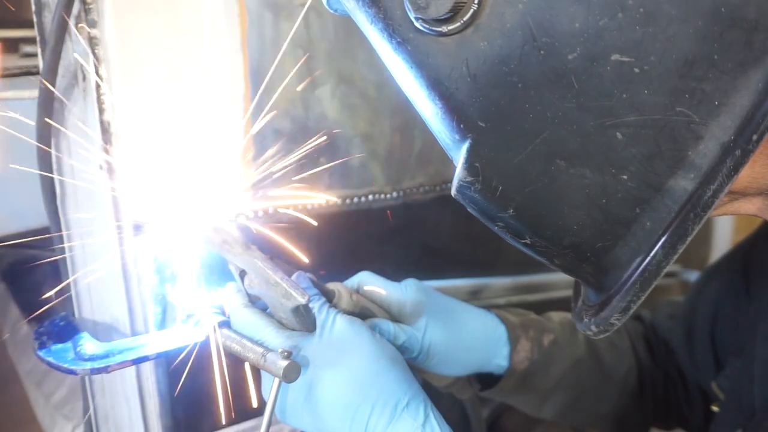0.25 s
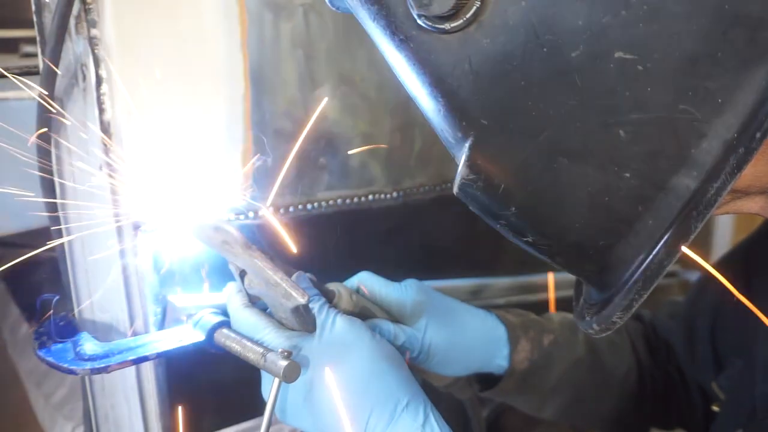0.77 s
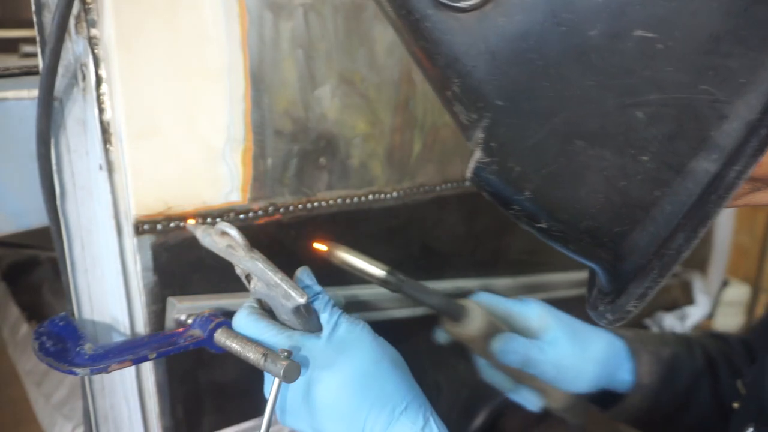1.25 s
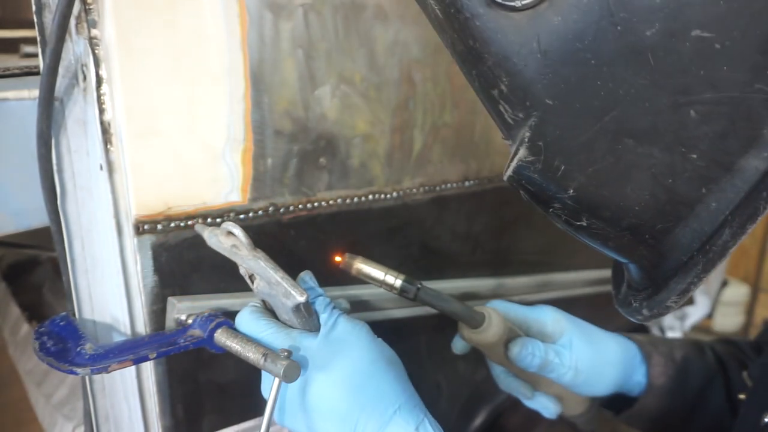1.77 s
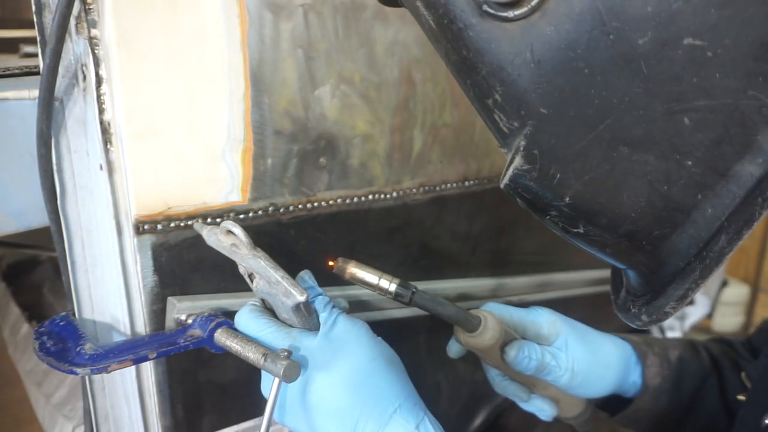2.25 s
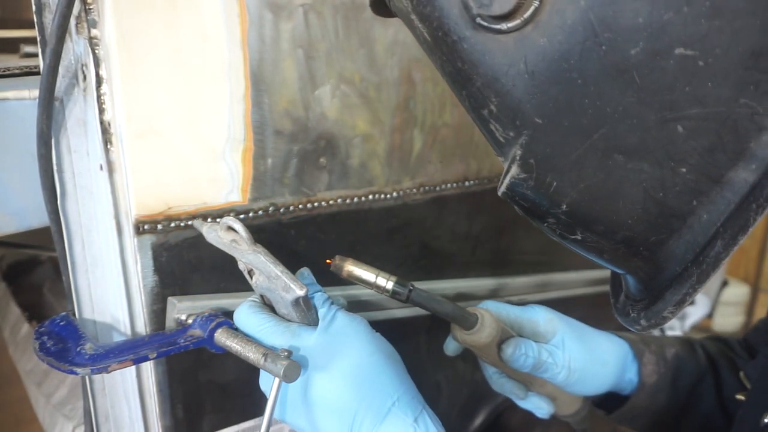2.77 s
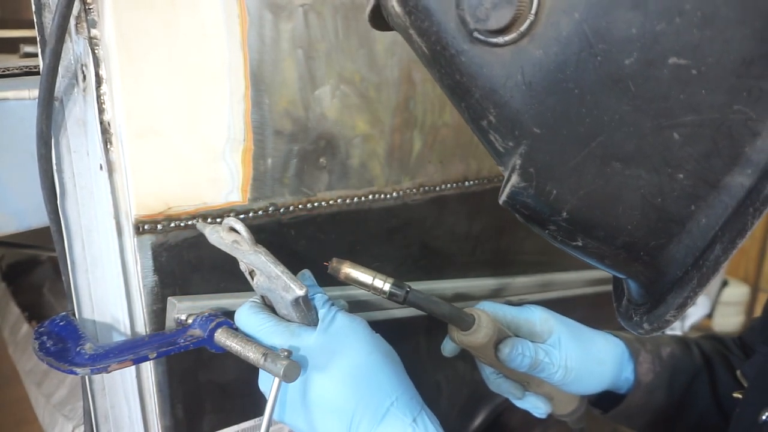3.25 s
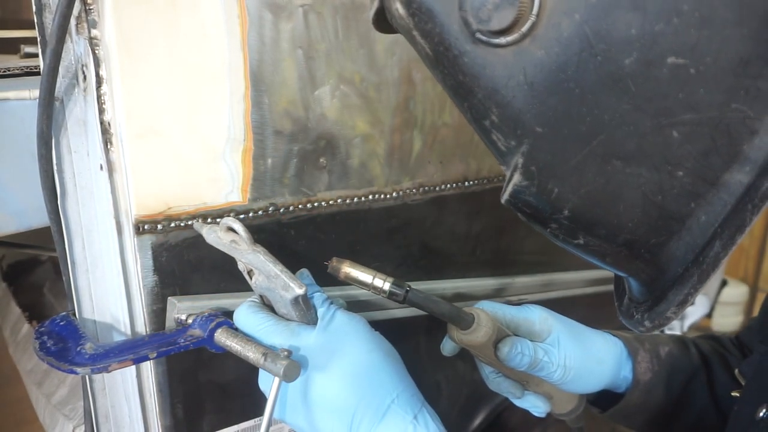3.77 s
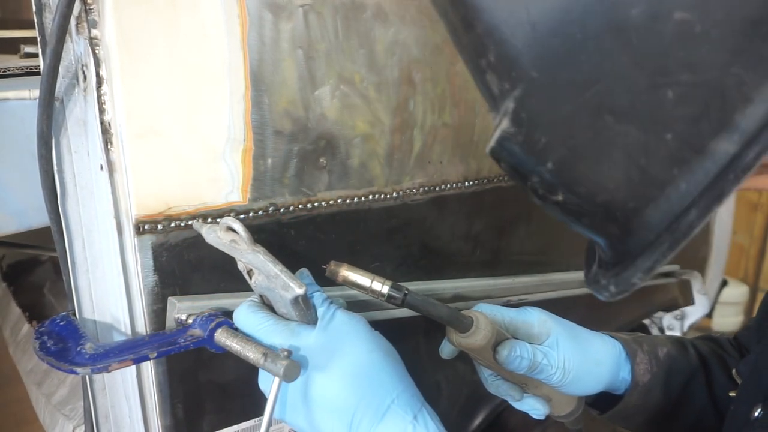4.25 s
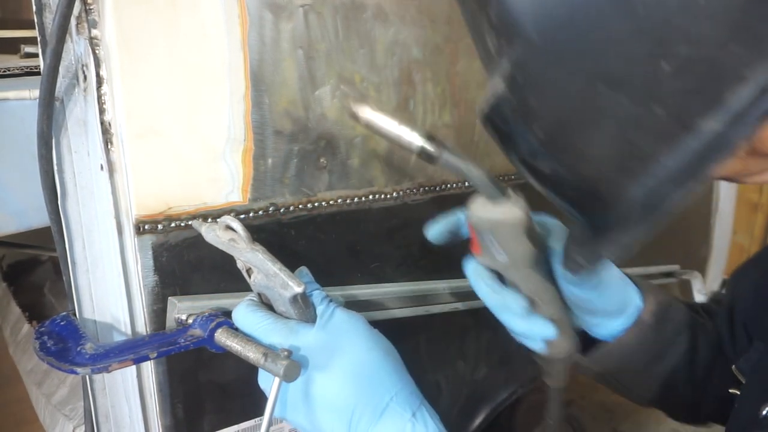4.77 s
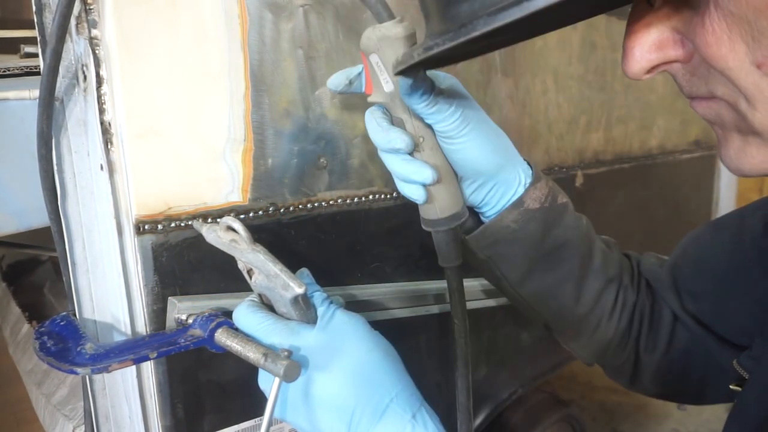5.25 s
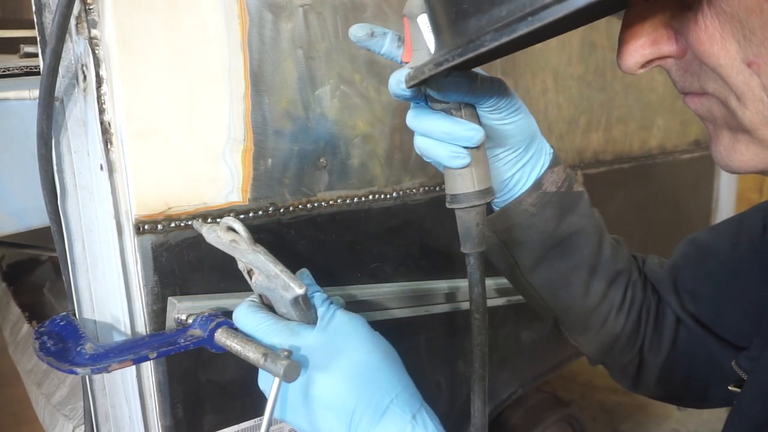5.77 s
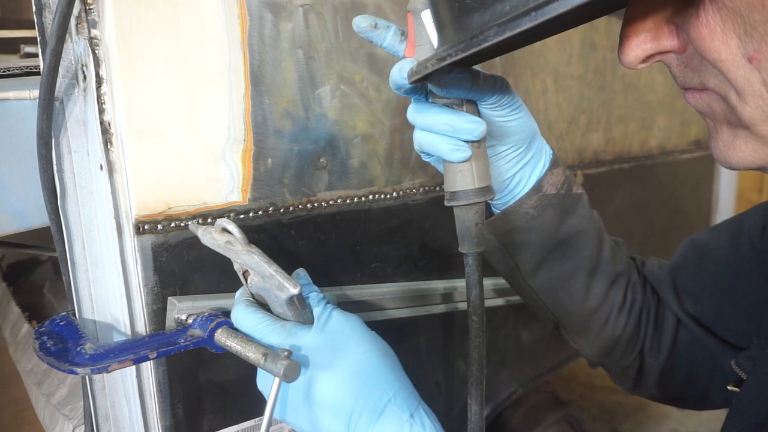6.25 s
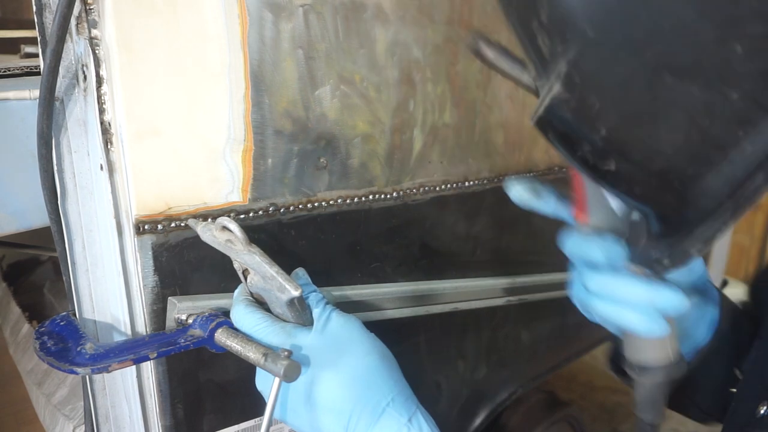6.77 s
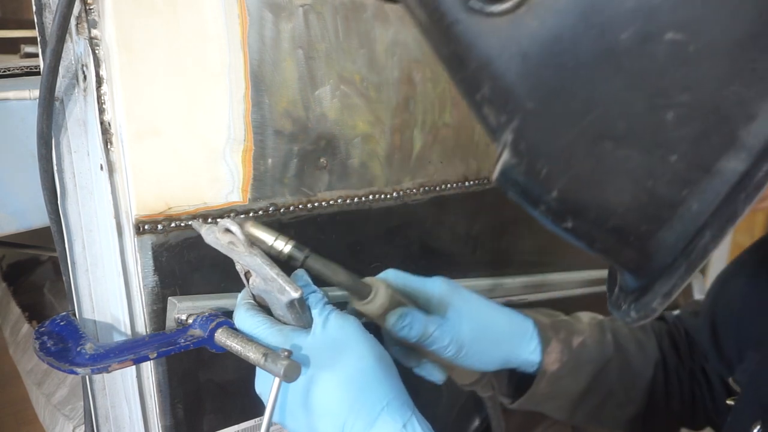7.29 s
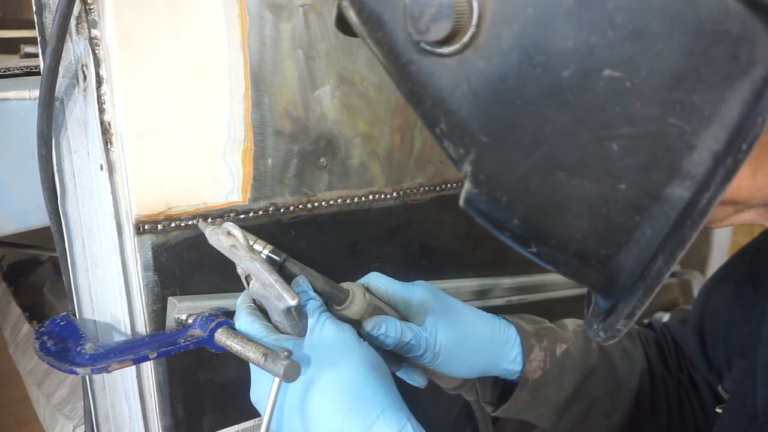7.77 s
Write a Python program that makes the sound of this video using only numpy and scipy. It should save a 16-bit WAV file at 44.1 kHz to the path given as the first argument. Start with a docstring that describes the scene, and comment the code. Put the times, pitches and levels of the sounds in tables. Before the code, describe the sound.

From 0 to about 0.87 s a welding arc crackles at close range: dozens of irregular, hard ringing snaps each second, fizzing between, with an initial pop and thicker spatter bursts around 0.25 and 0.45 s. The last snaps weaken and a short workshop reverberation fades. A thin bright hiss appears near 1.06 s over a faint fan whine around 590 Hz. At 1.24 s compressed air opens abruptly into a broad, bright, turbulent rush, stronger on the left, holding fairly steady with slight flutter. Hollow sliding tones colour it briefly near 1.4-1.6 and 2.45 s, then faintly from 4 s onward. It surges slightly around 5.03 s and shuts at 6.1 s. Fan whine and murmuring shop air gradually swell to the end at 8 s. Soft dull knocks cluster at 6.7-6.9 s; faint taps and crisp, grainy puffs follow at 7.5-7.9 s.

```python
"""A welding arc finishes a short run on a steel panel in a workshop: short circuits re-strike as ringing cracks.
Under it the power source's fan whines on one note, drifting sines over the shop's broad air noise and murmur;
this bed sinks and swells back along a drawn curve. A jet of compressed air, turbulent noise in bands, then cools
the seam, with hollow notes of sliding narrow noise. At the end the mask drops and the torch is set: grainy puffs."""
import sys
import numpy as np
from scipy import signal
from scipy.fft import rfft, irfft, next_fast_len
from scipy.io import wavfile

SR = 44100
rng = np.random.default_rng(int(sys.argv[2]) if len(sys.argv) > 2 else 0)


def wav_out(sig):
    """Save sig, one row per channel (or a flat mono array), as 16-bit PCM at SR to the path in sys.argv[1]."""
    wavfile.write(sys.argv[1], SR, np.round(np.clip(np.atleast_2d(sig).T, -1, 1) * 32767).astype(np.int16))


def field_ratio(decibels):
    """Amplitude ratio for a level in dB (20 dB per decade); scalars and array-likes work."""
    return 10 ** (np.asarray(decibels, dtype=float) / 20)


N = 353682

# moments at which the arc re-strikes after a short circuit: start_s
STRIKES_S = [.0341, .0457, .0632, .0706, .0754, .0857, .0901, .096, .104, .1169, .1255, .158, .1753, .1891,
             .2052, .2098, .2274, .2401, .2451, .25, .2684, .2863, .3045, .31, .3304, .3362, .3466, .3729,
             .3893, .3944, .4007, .4544, .4601, .4892, .5013, .5229, .5354, .5483, .5545, .5611, .5837,
             .5976, .6207, .6346, .6481, .661, .6752, .691, .7053, .7172, .7246, .7319, .7476, .7549, .7629,
             .7799, .7872, .7995, .8143, .8273, .842, .8713]
# resonances of a re-strike, body under 4 kHz and crack above: pitch_hz, width_hz, level_db
CRACK_RINGS = [(810, 1200, 1), (1550, 1840, 2.5), (2600, 1660, 1.5), (5000, 7500, -14), (7300, 990, -6.5),
               (8780, 1000, 1.5), (10070, 2200, -3)]
# stereo lean of those resonances: pitch_hz, left_over_right_db
CRACK_BALANCE = [(1000, -2), (3000, -1), (4700, 3), (7000, 7), (8800, 3), (10400, -2)]
# spatter bursts, strikes with a thump: start_s, thud_drive_db, extra_body_db (the crack gains a third of it)
SPATTER = [(.0341, -33, 1.5), (.2052, -58, -3.5), (.2274, -51, -2), (.2451, -39, 13), (.31, -52.5, -1),
           (0.4546, -52, 5.5), (.4892, -63.5, 2), (0.5017, -56.5, 3.5), (0.523, -49.5, 1.5)]
# arc plasma between the cracks: time_s, sizzle_db
SIZZLE = [(0, -23.5), (.05, -53.5), (.415, -45.5), (.432, -19.5), (.455, -23), (.53, -39), (.66, -29),
          (.78, -36.5), (.87, -40)]
# reflections from the nearest surfaces: delay_s, left_db, right_db
ECHOES = [(.00056, -13, -12), (.00125, -22, -12), (.00176, -13, -20), (.0047, -13, -13), (.0073, -15, -17),
          (.008, -17, -16)]
# decay of the shop's reverberation: pitch_hz, t60_s
SHOP_T60 = [(300, 0.68), (1100, 0.89), (2300, 0.67), (4500, 0.59), (9000, 0.43)]
# drawn level curve shared by fan, shop air and murmur: time_s, level_db
BACKGROUND = [(0, -65), (.035, -58), (.06, -75.5), (.86, -72.5), (.92, -61), (1.25, -54), (1.275, -73.5),
              (2.5, -75.5), (3.3, -66.5), (4.3, -70.5), (6.05, -69.5), (6.15, -62), (6.8, -55.5),
              (8.02, -49.5)]
# fan lines against that curve: pitch_hz, level_db, pitch_wander_hz
FAN_LINES = [(586.4, 4.5, 1.03), (220, -38, 4.8), (405, -31.5, 2.7), (670, -15.5, 32), (770, -43, 5.6),
             (1004, -28, 4.3), (1174, -39, 3.0), (1230, -44, 18), (1800, -35, 1.7)]
# relative spectrum of the shop air: pitch_hz, density_db (per Hz)
AIR_COLOUR = [(40, -87), (113, -68), (217, -51.5), (301, -41.5), (450, -67.5), (586, -22.5), (736, -40),
              (896, -36), (1480, -35.5), (3110, -42), (5600, -40.5), (8000, -55.5), (11000, -52)]
# stereo lean of fan, air and murmur: pitch_hz, left_over_right_db
AIR_BALANCE = [(100, -3), (600, -4), (1130, -8), (3600, -5.5), (11000, -1.5)]
# likeness of the air's two sides: pitch_hz, correlation (0 to 1)
AIR_LIKENESS = [(60, .88), (580, 0.8), (1220, 0.31), (2600, 0.31), (5500, .05)]
# bands in which the shop air murmurs: pitch_hz, width_hz (of each of two passes), relative_level_db
MURMUR_BANDS = [(1170, 32, 0), (1470, 71, -2), (1680, 95, -6), (1980, 78, -7), (2330, 46, -8)]
# knocks of mask and torch, before rise and decay: start_s, thump_db, scrape_db
KNOCKS = [(6.722, -54.5, -79), (6.783, -50, -82), (6.844, -58, -60), (7.541, -61, -82), (7.698, -67, -63)]
# short bright hisses near the nozzle, level before rise and decay:
# start_s, level_db, pitch_hz, width_hz (of each of two passes), t60_s
HISSES = [(1.062, -47.5, 9570, 1500, 1.7), (6.85, -72.5, 6500, 8000, 0.37),
          (7.535, -62.5, 9500, 2660, 0.59), (7.698, -55, 9800, 5000, 0.13), (7.701, -58, 4470, 7000, 0.55),
          (7.849, -46, 10980, 450, 0.45)]
# air jet as the nozzle turns, before body tilt and wander: time_s, level_db, extra_left_over_right_db
JET = [(1.24, -41, -9), (1.252, -36, 12), (1.27, -34.5, 0.5), (1.4, -33, 3.5), (2.0, -31.5, 0.6),
       (3.3, -31.5, -0.6), (4.96, -31, .5), (5.03, -28.5, 1), (5.1, -29.5, -1), (6.04, -32, 0.5),
       (6.1, -32.5, -3.5)]
# relative spectrum of the jet: pitch_hz, density_db (per Hz)
JET_COLOUR = [(100, -50), (300, -42.5), (600, -25.5), (1150, -19.5), (1540, -20), (2890, -15.5),
              (4500, -12.5), (6470, -10), (8300, -3), (10400, -1.5), (11200, 2.5)]
# stereo lean of the jet: pitch_hz, left_over_right_db
JET_BALANCE = [(60, -8.5), (170, -4.5), (500, 5.5), (1420, 3.5), (4090, 6), (11800, 5.5)]
# wash returned by the walls: pitch_hz, level_db (against the direct jet)
JET_WASH = [(100, 2), (300, -1.5), (1500, 4.5), (4000, 3.5), (9000, 1)]
# hollow notes of the jet crossing the seam: middle_s, half_length_s, pitch_hz, glide_hz_per_s, level_db
HOLLOW_NOTES = [(1.422, .08, 3960, 1397, -46.5), (1.565, .05, 4320, 3004, -48),
                (2.45, 0.052, 4000, -1500, -48), (4.8, 0.7, 2864, 149, -51), (5.746, 0.47, 2953, 9, -52.5),
                (6.04, 0.078, 2900, -500, -48)]

# the longer the wait, the bigger the droplet: levels after a full wait, loss per halving of it, scatter
FULL_WAIT_S = .017
CRACK_DB, CRACK_LOSS_DB, CRACK_SCATTER_DB = 4.5, 1.5, 1.5
BODY_DB, BODY_LOSS_DB, BODY_SCATTER_DB = -7, 3.5, 1.5
TRIGGER_OFF_S, STARVED_DB = .835, -5    # the last strikes, after the trigger is let go, are weaker
CRACK_SPREAD_S = 5e-5                   # the parts of a crack do not start together
ARC_LEAD_S, JET_LEAD_S = 4e-5, 4.2e-5   # left ahead of right
THUD_HZ, THUD_WIDTH_HZ = 560, 420
THUD_LAG_S, THUD_LEFT_DB = 5.5e-4, -1   # left behind right, and its gain
TAIL_HZ, TAIL_WIDTH_HZ = 7000, 16000    # what the walls receive of the arc: one broad band
TAIL_DB, SUNK_DB = -10.5, -72           # tail gain while the background curve is at SUNK_DB
MURMUR_DB = -24
# knock bands: pitch_hz, width_hz (of each of two passes), rise_s, t60_s
THUMP, SCRAPE = (500, 260, 0.0029, 0.18), (2000, 930, .004, .28)
HISS_RISE_PER_S = 0.038                 # times t60 squared, plus 0.2 ms, is a hiss's rise time
JET_USUAL_DB, BODY_RESISTS = -31, 1     # the body below the hiss cancels this share of the level's swing
BODY_LATE_DB, BODY_LATE_S = -7, .03     # and comes in just after the valve opens
JET_WANDER_DB, JET_WANDER_HZ = 0.79, 3.6
COLOUR_DRIFT_DB, COLOUR_DRIFT_HZ = 0.26, 1.7   # each band of the jet also wanders slowly on its own
HOLLOW_FADE_DB, HOLLOW_WAVER_DB = 12, 1.5      # drop at the ends of a note; unsteadiness
CUTOFF_HZ = 11005
BANDS_HZ = 40 * 2 ** np.arange(0, 8.4, 1 / 3)
LEFT_RIGHT = np.array([[1], [-1]])      # opposite signs on the two sides


def rms_one(x):
    """Scales a signal to an rms of 1."""
    return x / np.sqrt(np.mean(x ** 2) + 1e-20)


def in_time(rows, outside=None):
    """Draws straight lines through a table's columns, sample by sample."""
    s, *columns = np.transpose(rows)
    return [np.interp(np.arange(N) / SR, s, c, outside, outside) for c in columns]


def at_hz(points, hz):
    """Reads a table at a pitch, along a logarithmic pitch axis."""
    table_hz, values = np.array(points)[:, :2].T
    return np.interp(np.log(hz), np.log(table_hz), values)


def lean(balance_db):
    """Splits a left-over-right balance evenly into one gain for each side."""
    return field_ratio(balance_db / 2 * LEFT_RIGHT)


def drift(rate):
    """Slow chance: noise at every 40th sample through a double one-pole low-pass; spread 1."""
    r = np.exp(-80 * np.pi * rate / SR)
    slow = signal.lfilter([1], [1, -2 * r, r * r], rng.standard_normal(N // 40 + 2002))[2000:]
    return np.interp(np.arange(N) / 40, np.arange(len(slow)), rms_one(slow))


def poles(hz, width_hz):
    """Pole radius and feedback of a damped resonance; wider bands die sooner."""
    r = np.exp(-np.pi * width_hz / SR)
    return r, [1, -2 * r * np.cos(2 * np.pi * hz / SR), r * r]


def resonance(x, hz, width_hz):
    """Two-pole band, gain 1 on top."""
    r, feedback = poles(hz, width_hz)
    return signal.lfilter([(1 - r * r) / 2, 0, (r * r - 1) / 2], feedback, x + 1e-18)


def bands(white):
    """Third-octave slices, neighbours cut from unrelated noise."""
    for k, (low, high) in enumerate(zip(BANDS_HZ, BANDS_HZ[1:])):
        sos = signal.butter(2, [low, high], "band", fs=SR, output="sos")
        yield np.sqrt(low * high), signal.sosfilt(sos, white[k % 2])


def later(x, seconds):
    """Delay by any fraction of a sample, as a turn of phase."""
    size = next_fast_len(N + 64)
    turn = np.exp(-2j * np.pi * np.fft.rfftfreq(size, 1 / SR) * seconds)
    return irfft(rfft(x, size) * turn, size)[:N]


def shop(x, level_db):
    """Diffuse tail: noise of its own on each side that dies band by band."""
    t = np.arange(SR) / SR
    white = rng.standard_normal((2, 2, SR))
    tail = sum(band * field_ratio(-60 * t / at_hz(SHOP_T60, hz)) for hz, band in bands(white))
    tail = tail * np.clip((t - .006) / 0.0013, 0, 1)      # reflections thicken after the first walls
    tail = tail / np.sqrt(np.sum(tail ** 2) / 2)
    return field_ratio(level_db) * signal.fftconvolve(x[None], tail, axes=1)[:, :N]


def plasma_sizzle():
    """Plasma between the cracks: sparse random spits of either sign and uneven size."""
    level, = in_time(SIZZLE, outside=-120)
    sizes = field_ratio(3 * rng.exponential(1, N))
    spits = (rng.random(N) < 4000 / SR) * sizes * rng.choice([-1, 1], N)
    return field_ratio(level) * rms_one(spits)


def spatter_thud():
    """Spatter bursts thump at close range: a damped push, bass and all."""
    pushes = np.zeros(N)
    for when, thud_db, _ in SPATTER:
        pushes[round(when * SR)] = field_ratio(thud_db)
    _, feedback = poles(THUD_HZ, THUD_WIDTH_HZ)
    thud = signal.lfilter([1], feedback, pushes + 1e-18)
    return np.array([field_ratio(THUD_LEFT_DB) * later(thud, THUD_LAG_S), thud])


def arc():
    """Each re-strike is a sudden pressure step that rings body and crack, then echoes round the shop."""
    s = np.array(STRIKES_S)
    halvings = np.clip(np.log2(FULL_WAIT_S / np.diff(s, prepend=0)), 0, 3)
    chance = rng.standard_normal((len(s), 2 + len(CRACK_RINGS)))
    offset = rng.random((len(s), len(CRACK_RINGS)))
    starved = STARVED_DB * (s > TRIGGER_OFF_S)
    crack_db = CRACK_DB - CRACK_LOSS_DB * halvings + CRACK_SCATTER_DB * chance[:, 0] + starved
    body_db = BODY_DB - BODY_LOSS_DB * halvings + BODY_SCATTER_DB * chance[:, 1] + starved
    for when, _, extra_db in SPATTER:
        which = np.argmin(abs(s - when))
        body_db[which] += extra_db
        crack_db[which] += extra_db / 3

    sizzle, near = plasma_sizzle(), 0
    for k, (hz, width_hz, level_db) in enumerate(CRACK_RINGS):
        uneven_db = 1.5 * chance[:, 2 + k]      # no two cracks ring alike
        is_body = hz < 4000
        drive = field_ratio(-14.0 if is_body else 0) * sizzle
        early_s = CRACK_SPREAD_S * (1 + (0 if is_body else offset[:, k]))
        at = np.round((s - early_s) * SR).astype(int)
        drive[at] += field_ratio((body_db if is_body else crack_db) + uneven_db)
        sides = field_ratio(level_db) * lean(at_hz(CRACK_BALANCE, hz))
        near = near + resonance(drive, hz, width_hz) * (-1) ** k * sides

    heard = near.copy()
    for delay, left_db, right_db in ECHOES:
        lag = round(delay * SR)
        heard[:, lag:] += field_ratio(np.array([[left_db], [right_db]])) * near[:, :-lag]
    heard[1] = later(heard[1], ARC_LEAD_S)

    sent = sizzle.copy()
    sent[np.round(s * SR).astype(int)] += field_ratio(crack_db)
    swell = field_ratio(0.7 * (in_time(BACKGROUND)[0] - SUNK_DB))   # the tail rides up with the background
    tail = shop(resonance(sent, TAIL_HZ, TAIL_WIDTH_HZ), level_db=TAIL_DB)
    return heard + spatter_thud() + swell * tail


def fan():
    """A blade-passing tone, its overtones and neighbours, each wavering in pitch and level."""
    out = 0
    for hz, level_db, wander_hz in FAN_LINES:
        phase = 2 * np.pi * np.cumsum(hz + wander_hz * drift(30)) / SR
        sides = np.sin(phase + np.array([[-.2], [0]])) * lean(at_hz(AIR_BALANCE, hz))
        out = out + np.sqrt(2) * field_ratio(level_db + 1.3 * drift(21)) * sides
    return out


def shop_air():
    """Steady broad noise, its sides much alike in the bass and ever less so higher up."""
    out = 0
    for hz, (mid, side) in bands(rng.standard_normal((2, 2, N))):
        alike = np.clip(at_hz(AIR_LIKENESS, hz), 0, 1)
        gain = field_ratio(at_hz(AIR_COLOUR, hz)) * lean(at_hz(AIR_BALANCE, hz))
        out = out + gain * (np.sqrt(1 + alike) * mid + np.sqrt(1 - alike) * side * LEFT_RIGHT)
    return rms_one(out)


def murmur():
    """Noise in a few narrow bands, slowly swelling and sinking."""
    mid, side = rng.standard_normal((2, N))
    white = mid + 0.44 * side * LEFT_RIGHT
    out = 0
    for hz, width_hz, level_db in MURMUR_BANDS:
        band = rms_one(resonance(resonance(white, hz, width_hz), hz, width_hz))
        gain = field_ratio(MURMUR_DB + level_db + 1.2 * drift(2.0))
        out = out + gain * lean(at_hz(AIR_BALANCE, hz)) * band
    return out


def handling():
    """Mask, cloth and nozzle: grainy noise in one band that rises fast and dies away."""
    out, t = np.zeros((2, N)), np.arange(SR) / SR
    puffs = []
    for s, thump_db, scrape_db in KNOCKS:
        puffs += [(s, thump_db, *THUMP), (s, scrape_db, *SCRAPE)]
    for s, level_db, hz, width_hz, t60 in HISSES:
        puffs.append((s, level_db, hz, width_hz, 2e-4 + HISS_RISE_PER_S * t60 ** 2, t60))
    for s, level_db, hz, width_hz, rise, t60 in puffs:
        mid, side = rng.standard_normal((2, SR))
        grain = mid + 0.82 * side * LEFT_RIGHT
        puff = resonance(resonance(grain, hz, width_hz), hz, width_hz)
        shape = np.clip(t / rise, 0, 1) * field_ratio(level_db - 60 * t / t60)
        at = round(s * SR)
        out[:, at:at + SR] += (rms_one(puff) * shape)[:, :N - at]
    return out


def air_jet(patchy_db, knee_hz):
    """Turbulent noise, each band gusting a little; it reaches the left first, and the walls return a wash."""
    level, pan = in_time(JET)
    level = level + JET_WANDER_DB * drift(JET_WANDER_HZ)
    opens, shuts = JET[0][0], JET[-1][0]
    late = np.clip(1 - (np.arange(N) / SR - opens) / BODY_LATE_S, 0, 1)
    body = np.where(late > 0, BODY_LATE_DB * late, BODY_RESISTS * (JET_USUAL_DB - level))
    valve, = in_time([(opens - .01, 0), (opens, 1), (shuts, 1), (shuts + 0.036, 0)])
    gust, near, washed, power = drift(12), 0, 0, 0
    for hz, (direct, *wash) in bands(rng.standard_normal((2, 3, N))):
        colour_db = at_hz(JET_COLOUR, hz)
        tilt = body / (1 + (hz / knee_hz) ** 4)
        flutter = patchy_db * (0.26 * gust + drift(59)) + COLOUR_DRIFT_DB * drift(COLOUR_DRIFT_HZ)
        gain = valve * field_ratio(level + colour_db + tilt + flutter)
        keep = field_ratio(-120 / (SR * at_hz(SHOP_T60, hz)))      # share of the wash's energy kept each sample
        stored = signal.lfilter([1 - keep], [1, -keep], gain ** 2 + 1e-18)
        sides = lean(at_hz(JET_BALANCE, hz) + pan)
        near = near + sides * gain * direct
        washed = washed + field_ratio(at_hz(JET_WASH, hz)) * np.sqrt(sides * stored) * np.array(wash)
        power += np.var(direct) * field_ratio(colour_db) ** 2
    near = np.array([near[0], later(near[1], JET_LEAD_S)])
    return (near + washed) / np.sqrt(power)


def hollow(width_hz):
    """A narrow band of noise whose centre slides; each note swells and fades."""
    t, out, waver = np.arange(N) / SR, 0, HOLLOW_WAVER_DB * drift(3)
    low_pass = signal.butter(2, width_hz / 2, fs=SR, output="sos")
    slow = signal.sosfilt(low_pass, rng.standard_normal((2, 2, N)))
    blowing = t < JET[-1][0]
    for s, half, hz, glide, level_db in HOLLOW_NOTES:
        phase = 2 * np.pi * (hz + glide * (t - s) / 2) * (t - s)
        mid, side = slow[0] * np.cos(phase) + slow[1] * np.sin(phase)
        note = rms_one(mid * lean(3) + .5 * side * LEFT_RIGHT)
        fade = HOLLOW_FADE_DB * ((t - s) / half) ** 2
        out = out + blowing * field_ratio(level_db + waver - fade) * note
    return out


def scene():
    """Mixes arc, fan and shop bed, handling, jet and hollow notes."""
    level, = in_time(BACKGROUND)
    background = field_ratio(level) * (fan() + field_ratio(-12.5) * shop_air() + murmur())
    jet = air_jet(patchy_db=2.43, knee_hz=5500) + hollow(width_hz=380)
    return arc() + background + handling() + jet


def roll_off(x):
    """The treble ends steeply here."""
    return signal.sosfilt(signal.butter(12, 12360, fs=SR, output="sos"), x)


def record(dry):
    """The bass is thinned, the top cut steeply without delay; rounded peaks spill a little past the cut."""
    thin = signal.sosfilt(signal.butter(2, 170, "high", fs=SR, output="sos"), dry)
    cut = signal.sosfiltfilt(signal.ellip(10, .1, 36, CUTOFF_HZ, fs=SR, output="sos"), thin)
    mix = 0.73 * np.tanh(cut / 0.69)
    return roll_off(mix)


dry = scene()
out = record(dry)
wav_out(out)
```